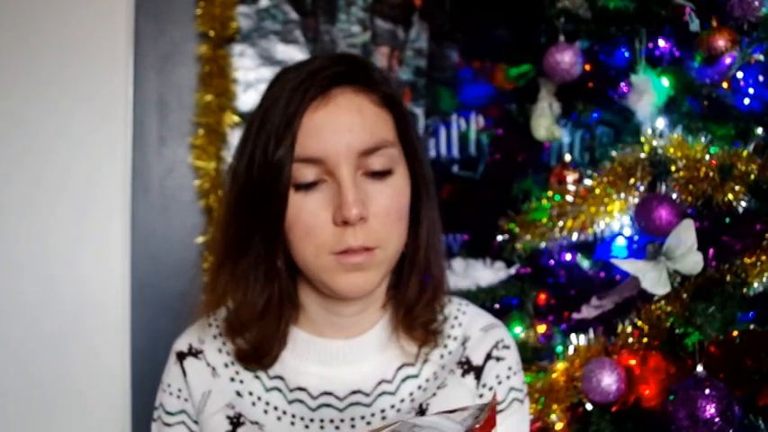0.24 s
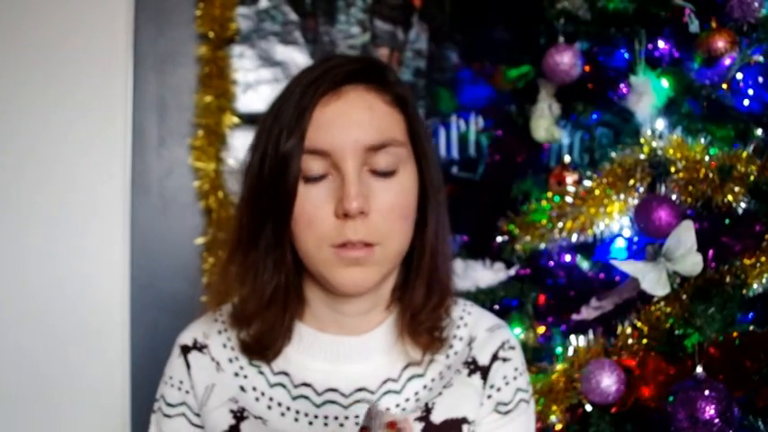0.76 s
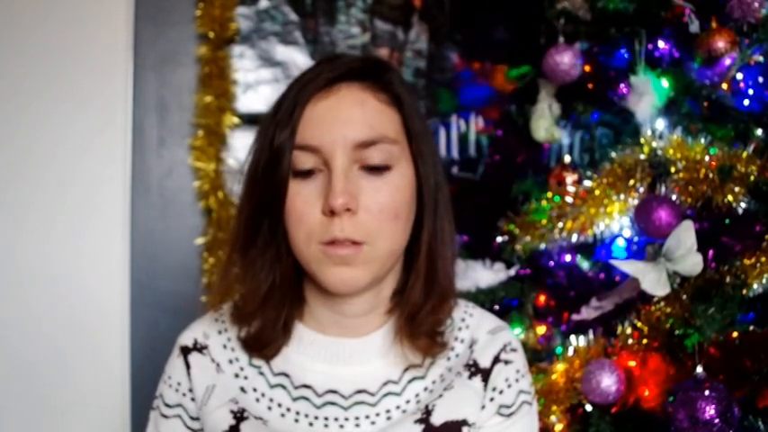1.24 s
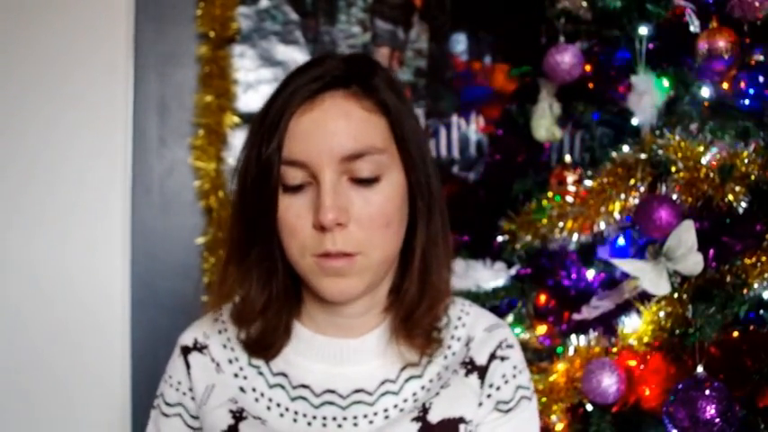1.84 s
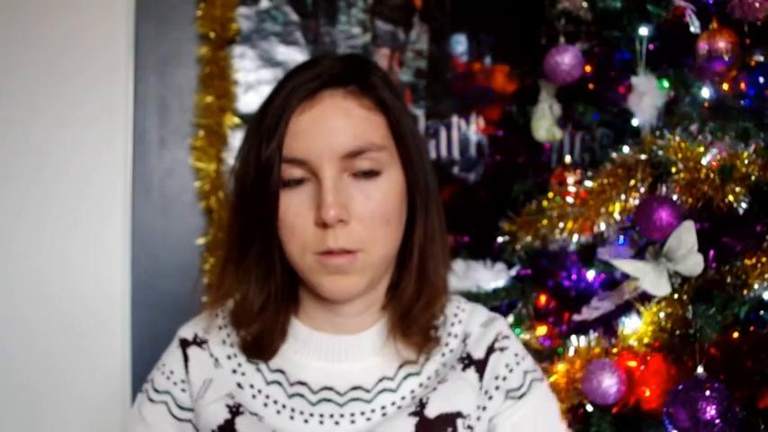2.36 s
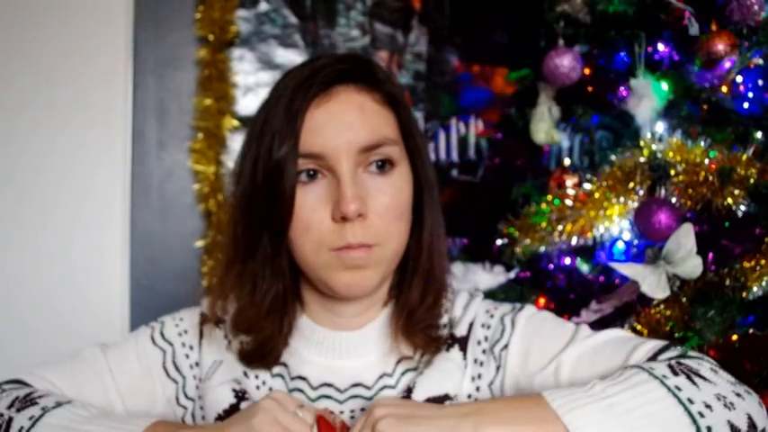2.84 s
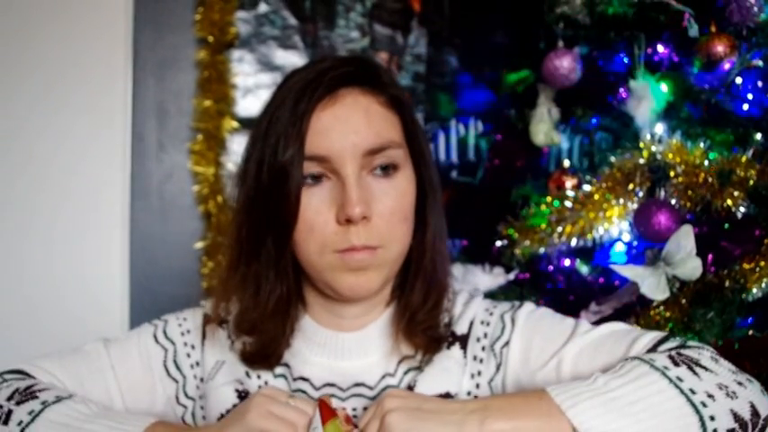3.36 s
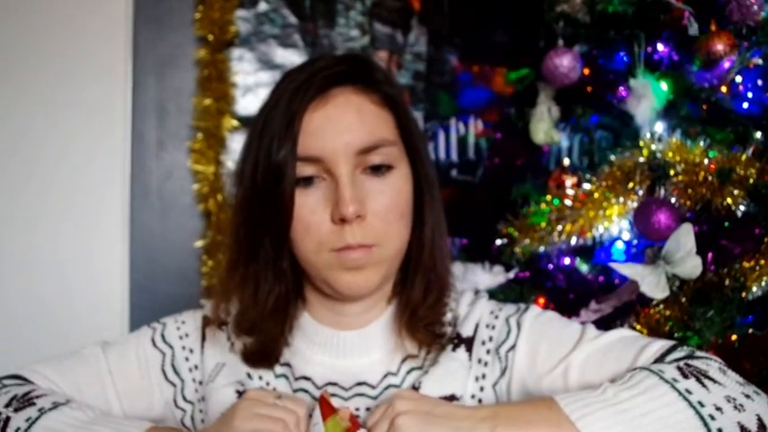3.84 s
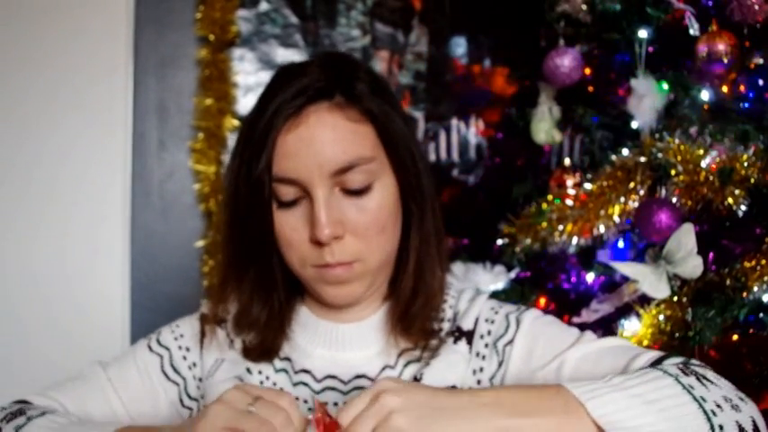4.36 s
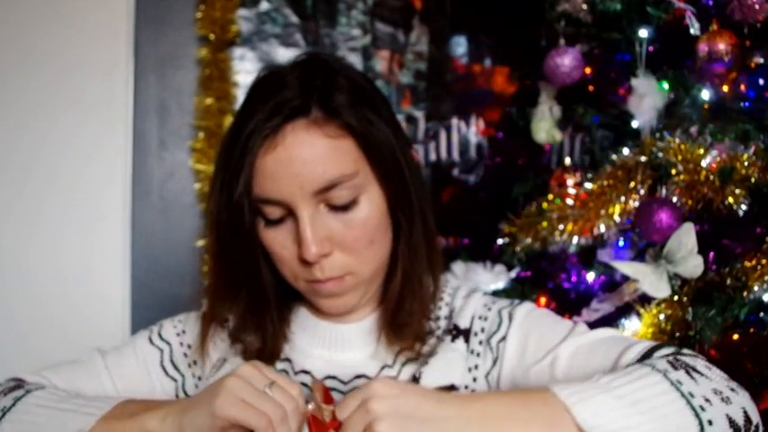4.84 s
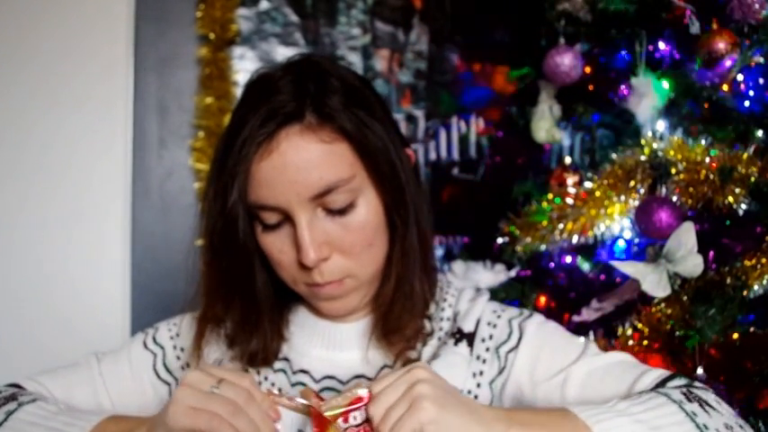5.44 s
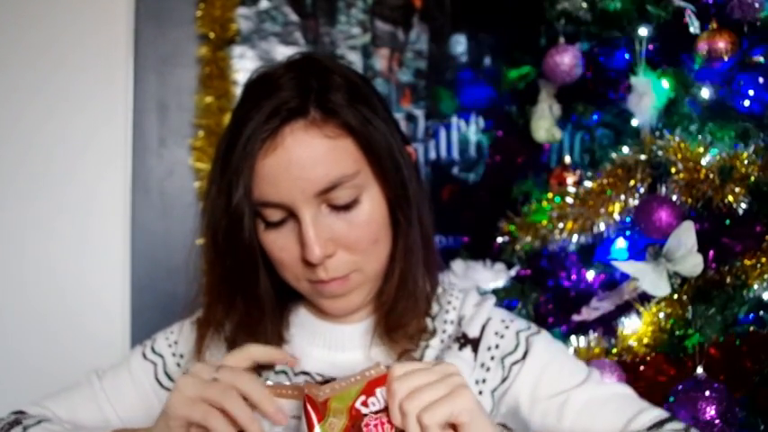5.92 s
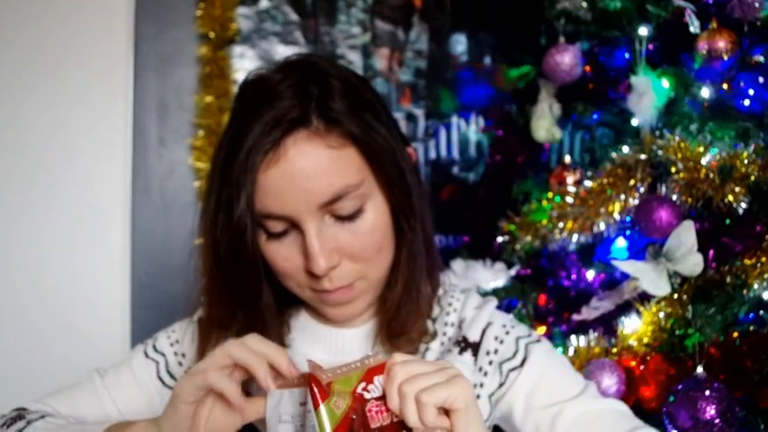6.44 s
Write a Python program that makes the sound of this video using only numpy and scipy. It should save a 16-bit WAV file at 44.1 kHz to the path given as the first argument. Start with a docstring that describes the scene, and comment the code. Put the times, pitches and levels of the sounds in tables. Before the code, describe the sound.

Very close to the microphone in a small room, a plastic snack packet is turned over with bursts of crisp crackle, sharp snaps and dull pouch pops. Around three seconds the seal gives in a quick run of bright ticks, then the taut film squeaks faintly. More tugs crackle and snap before thinning to sparse small rustles over quiet air and a faint hum.

```python
"""Opening a plastic snack packet

A packet is turned over in the hands and pulled open, close to the microphone in a small room.
Creases snap as noise bursts ringing in resonators; folds crackle as random clicks in resonator banks.
The pouch flexes dully, the seam squeaks by stick and slip, and the seal parts in runs of bright ticks.
Quiet air and a faint hum lie behind; the sharpest snaps overload the microphone."""
import sys
import numpy as np
from scipy import signal
from scipy.fft import rfft, irfft, next_fast_len
from scipy.io import wavfile
from scipy.ndimage import uniform_filter1d

SR = 44100
rng = np.random.default_rng(int(sys.argv[2]) if len(sys.argv) > 2 else 0)


def bounce(signal):
    """Save signal as a 16-bit WAV file at the path given by the first command-line argument."""
    frames = np.transpose(np.atleast_2d(signal))
    limited = np.clip(frames, -1, 1)
    pcm = np.round(limited * 32767).astype(np.int16)
    wavfile.write(sys.argv[1], SR, pcm)


N = 295029
TIME = np.arange(N) / SR
OPPOSITE = np.array([[1], [-1]])   # equal and opposite in left and right


def from_db(db):
    """Logarithmic level: decibels to amplitude gain."""
    return 10 ** (np.asarray(db) / 20)


def rms_one(x):
    """Power normalization: scale to unit rms."""
    return x / np.sqrt(np.mean(x ** 2) + 1e-20)


def at_hz(points, hz):
    """Logarithmic frequency scale: read a table between its points."""
    known_hz, values = np.transpose(points)
    return np.interp(np.log(np.maximum(hz, 1)), np.log(known_hz), values)


def drift(rate):
    """Random modulation: noise joined by straight lines, `rate` points per second, rms 1."""
    knots = rng.standard_normal(N // 10)
    return rms_one(np.interp(TIME * rate, np.arange(len(knots)), knots))


def stroke(start, length, edge_s):
    """Kinematics of a movement: progress from 0 to 1, and a gain that fades in and out at its ends."""
    age = TIME - start
    progress = np.clip(age / length, 0, 1)
    fade = np.clip(np.minimum(age, length - age) / edge_s, 0, 1)
    return progress, fade


def colour(x, spectrum, size=4096):
    """Minimum-phase filtering: the folded cepstrum gives a causal response with the given spectrum."""
    gain = from_db(at_hz(spectrum, np.fft.rfftfreq(size, 1 / SR)))
    cepstrum = irfft(np.log(gain))
    cepstrum[1:size // 2] *= 2
    cepstrum[size // 2 + 1:] = 0
    response = irfft(np.exp(rfft(cepstrum)))
    return signal.oaconvolve(x, response[None], axes=-1)[:, :x.shape[-1]]


def resonate(x, hz, width_hz):
    """Damped resonance: a two-pole filter with about unit gain at its peak."""
    r = np.exp(-np.pi * width_hz / SR)
    zeros = np.array([1, 0, -1]) * (1 - r * r) / 2
    poles = [1, -2 * r * np.cos(2 * np.pi * hz / SR), r * r]
    return signal.lfilter(zeros, poles, x + 1e-18)


# likeness of the two microphone ports in diffuse sound: hz, correlation
PORT_LIKENESS = [(100, .98), (350, .98), (700, .88), (1400, .58), (3000, .15), (8000, .05), (16000, 0)]


def diffuse(length):
    """Diffuse-field coherence: white stereo noise from all sides, alike at the two ports in the bass only."""
    size = next_fast_len(length)
    mid, side = rfft(rng.standard_normal((2, size)))
    alike = np.clip(at_hz(PORT_LIKENESS, np.fft.rfftfreq(size, 1 / SR)), -1, 1)
    both = np.sqrt((1 + alike) / 2) * mid + np.sqrt((1 - alike) / 2) * side * OPPOSITE
    return irfft(both, size)[:, :length]


# spectrum of the still air: hz, relative_db
AIR_SPECTRUM = [(15, 6), (35, -4), (60, -14), (130, -6.5), (250, -12.5), (500, -12.5), (1000, -12),
                (2000, -15), (4000, -23), (8000, -19.5), (11000, -27.5), (16000, -31)]


def still_air(level_db=-49.5):
    """Stationary diffuse noise: coloured noise with a steady rms level."""
    return from_db(level_db) * rms_one(colour(diffuse(N), AIR_SPECTRUM))


def hum(hz=120.4, level_db=-65.5):
    """Amplitude modulation: a steady low tone wavers in level."""
    waver = 1 + drift(7.1) / 2
    return from_db(level_db) * waver * np.sin(2 * np.pi * hz * TIME)


# decay time of the room: hz, t60_s
ROOM_DECAY = [(200, 0.42), (1000, 0.2), (4000, 0.34), (8000, 0.25), (16000, 0.22)]
# colour of the wall reflections: hz, relative_db
WALL_COLOUR = [(100, -15.5), (300, -3), (700, 1.5), (1500, 3.5), (4000, -5), (8000, 3), (11000, -1),
               (16000, 11)]


def room_response(wet_db=-6, gap_s=0.0064, near_db=-15, near_s=.0025, size=20000):
    """Reverberant decay: the hands scatter at once; the walls answer later and die away band by band."""
    t = np.arange(size) / SR
    noise = diffuse(size)
    hz, s, bands = signal.stft(noise, SR, nperseg=256)
    decay = from_db(-60 * s / at_hz(ROOM_DECAY, hz)[:, None])
    tail = signal.istft(bands * decay, SR)[1][:, :size]
    walls = colour(rms_one(tail * (t > gap_s)), WALL_COLOUR)
    hands = rms_one(noise * np.exp(-t / near_s))
    return (from_db(wet_db) * walls + from_db(near_db) * hands) / np.sqrt(size)


def room(x, turns_per_s=170, count=4):
    """Time-varying reverberation: facets of the moving packet face different ways, changing the echoes."""
    facing = np.floor(TIME * turns_per_s) % count
    shares = [uniform_filter1d(1.0 * (facing == k), size=128) for k in range(count)]
    out = x
    for share in shares:
        sent = x * np.sqrt(np.abs(share))
        out = out + signal.oaconvolve(sent, room_response(), axes=-1)[:, :N]
    return out


# a panel of the pouch pops in or out under a finger: start_s, relative_peak_db, pitch_hz
PANEL_POPS = [(0.433, -9, 226), (0.654, -5.5, 615), (0.751, -14, 480), (1.574, -16.5, 347),
              (1.74, -22, 256), (1.757, -14, 453), (1.856, -21, 300), (2.114, -25, 540), (2.253, -25, 910),
              (2.529, -24, 402), (3.103, -11, 713), (4.016, -17.5, 510), (4.156, -21, 420),
              (4.847, -23, 390), (5.194, -21, 720)]


def bumps(decay_s=0.0034, width=0.51, level_db=-6, puff_hz=75, puff_db=-20, size=1024):
    """Snap-through buckling: a dull, heavily damped knock and a low puff of displaced air."""
    out = np.zeros(N + size)
    t = np.arange(size) / SR
    puff = from_db(puff_db) * np.sin(2 * np.pi * puff_hz * t) * np.exp(-2 * puff_hz * t)
    for s, peak_db, hz in PANEL_POPS:
        push = rng.standard_normal(size) * np.exp(-t / decay_s)
        knock = resonate(resonate(push, hz, width * hz), hz, 2 * width * hz)
        start = int(s * SR)
        out[start:start + size] += from_db(peak_db + level_db) * (knock / np.abs(knock).max() + puff)
    return out[:N]


def kneading(depth_db=2, per_s=35):
    """Random loading: the hands knead the film unevenly, so its level wanders."""
    return from_db(depth_db * drift(per_s))


# each squeeze or tug of the fingers, levels before kneading and room:
# start_s, length_s, fine_crackle_db, wider_folds_above_fine_db, flexing_pouch_above_fine_db
HAND_GRIPS = [(0, 0.052, -42.5, 3.5, 2), (0.359, 0.11, -31, 0, -4.5), (0.441, 0.045, -23.5, -0.5, -13),
              (0.588, 0.13, -38, 2.5, -1), (0.737, 0.017, -22, 0.5, -7), (0.859, 0.039, -26, -1.5, -13),
              (0.983, 0.13, -27, -4, -10), (1.205, 0.029, -30, -9.5, -18), (1.393, 0.02, -25.5, -6.5, -19),
              (1.494, 0.09, -27, -3.5, -11.5), (1.629, 0.041, -26.5, -2, -14),
              (1.739, 0.13, -34.5, -0.5, 0.5), (1.913, 0.059, -40.5, -0.5, -1),
              (2.077, 0.054, -51.5, 10, 10.5), (2.226, 0.064, -24.5, -14.5, -12),
              (2.347, 0.037, -33, -8, -11.5), (2.505, 0.14, -36, -6, -5.5),
              (2.668, 0.16, -32.5, -12, -18.5), (2.792, 0.058, -32, -1.5, -8.5),
              (2.919, 0.079, -32.5, -7, -12.5), (3.025, 0.092, -36.5, -1.5, -10),
              (3.342, 0.075, -33, -10, -22), (3.43, 0.047, -35, -7, -17), (3.517, 0.043, -28.5, -31, -24),
              (3.67, 0.14, -46, -31.5, -41), (3.822, 0.15, -31.5, -12.5, -28),
              (4.008, 0.14, -33, -2.5, -13.5), (4.195, 0.089, -42, 0, -8.5),
              (4.356, 0.12, -31.5, -7.5, -12), (4.505, 0.11, -37, -4, -6), (4.734, 0.031, -33, -2.5, -4),
              (4.822, 0.092, -31, -4.5, -9.5), (4.974, 0.061, -25, -3, -9.5), (5.185, 0.042, -33, -2, -6),
              (5.29, 0.094, -35, 0.5, -4), (5.494, 0.072, -46.5, 6.5, 4), (5.578, 0.057, -47.5, 6, 1.5),
              (5.645, 0.057, -35.5, -1.5, -6), (5.805, 0.057, -33.5, -4.5, -12.5),
              (5.871, 0.091, -44.5, -1.5, -1), (6.066, 0.015, -46.5, 12, 4), (6.418, 0.016, -41, 2, -10),
              (6.642, 0.054, -41, -9, -4)]


def gripping(levels_db, relax_db_per_s, attack_s=0.0096, resting_db=-63.5):
    """Exponential relaxation: each grip rises fast, holds and dies away over a faint resting rustle."""
    coarse_time = TIME[::16]
    power = from_db(resting_db) ** 2
    for (start, length, *_), db in zip(HAND_GRIPS, levels_db):
        age = coarse_time - start
        rise = np.clip(age / attack_s, 0, 1) ** 2
        fall = from_db(db - relax_db_per_s * np.maximum(age - length, 0))
        power = power + (rise * fall) ** 2
    return np.interp(TIME, coarse_time, np.sqrt(power))


# colour of the film: hz, relative_db
FILM_COLOUR = [(100, -16.5), (250, 6), (600, 4.5), (1200, 7), (2500, 9.5), (4500, 9.5), (6500, 9.5),
               (8100, 11), (9300, 6.5), (10500, 2), (13000, -3.5), (16000, -18)]


def crackle(low_hz, high_hz, per_s, spread_db, width, apart, count=10):
    """Clustered random impulses: tiny buckles each ring one facet, at a random place; running rms near 1."""
    clumps = from_db(4 * drift(70))
    at = np.flatnonzero(rng.random(N) < per_s * clumps / SR)
    sizes = from_db(spread_db * np.minimum(rng.exponential(1, N), 3.8))[at] * rng.choice([-1, 1], N)[at]
    facet = rng.integers(0, count, N)[at]
    place = rng.standard_normal(N)[at]
    out = np.zeros((2, N))
    for k, hz in enumerate(np.geomspace(low_hz, min(high_hz, .45 * SR), count)):
        clicks = np.zeros((2, N))
        clicks[:, at] = sizes * (facet == k) * (1 + apart * place * OPPOSITE)
        out += resonate(clicks, hz, width * hz)
    # a facet radiates little below its own ring
    thin = signal.butter(2, low_hz / 2, "high", fs=SR, output="sos")
    out = signal.sosfilt(thin, colour(out, FILM_COLOUR))
    running_power = uniform_filter1d(np.mean(out ** 2, axis=0), size=2048)
    return out / np.sqrt(running_power + 1e-12)


# the seam is held taut: start_s, length_s
TAUT_TIME = (3.345, .5)


def taut_film(low_hz=5200, high_hz=11600, first_db=-35, last_db=-45, flicker_db=4, count=10):
    """Distributed friction: small contacts squeal faintly, each coming and going at a wandering pitch."""
    wander, rough = .04, .026   # slow and fast pitch deviation, natural-log units rms
    progress, fade = stroke(*TAUT_TIME, edge_s=.01)
    out = np.zeros(N)
    for hz in np.geomspace(low_hz, high_hz, count):
        slips = hz * np.exp(wander * drift(45) + rough * drift(2500))
        out += from_db(flicker_db * drift(35)) * np.sin(2 * np.pi * np.cumsum(slips) / SR)
    return rms_one(out) * fade * from_db(first_db + (last_db - first_db) * progress)


# short squeaks of the stretched seam, pitch before its waver:
# start_s, length_s, first_slips_hz, last_slips_hz, relative_level_db, gain_per_overtone_db
SEAM_SQUEAKS = [(3.356, .03, 6500, 3700, -41, 12), (3.44, 0.045, 3250, 3050, -38, 0),
                (3.492, 0.018, 2800, 4200, -50, 4), (3.542, .03, 5800, 3600, -32.5, -5),
                (3.57, .036, 4800, 3400, -29, -1), (3.643, 0.099, 3000, 4000, -56, 0),
                (3.736, 0.068, 3000, 3400, -59, 11.5), (3.799, 0.046, 3200, 5100, -39.5, 4)]
# partials of the squeak, half orders coming from uneven slips: multiple, relative_db
SEAM_PARTIALS = [(.5, -16), (1, 0), (1.5, -8), (2, 2), (2.5, -12), (3, -3)]


def squeak(edge_s=0.005):
    """Stick-slip friction: each squeak glides and wavers in pitch; each partial flutters on its own."""
    hz, gain, bright_db = np.zeros((3, N))
    for start, length, from_hz, to_hz, db, step_db in SEAM_SQUEAKS:
        progress, fade = stroke(start, length, edge_s)
        on = fade > 0
        hz[on] = from_hz + (to_hz - from_hz) * progress[on]
        gain[on] = from_db(db) * fade[on]
        bright_db[on] = step_db
    slips = hz * (1 + .012 * drift(150) + .028 * drift(2500))
    phase = 2 * np.pi * np.cumsum(slips) / SR
    out = np.zeros(N)
    for multiple, part_db in SEAM_PARTIALS:
        strength = from_db(part_db + bright_db * (multiple - 1) + 3 * drift(500))
        out += strength * np.sin(multiple * phase)
    return signal.sosfilt(signal.butter(7, 11300, fs=SR, output="sos"), out * gain)


# the seal gives way in pulls, tick rates before their unevenness:
# start_s, length_s, first_ticks_per_s, last_ticks_per_s, relative_level_db
SEAL_PULLS = [(2.955, .15, 150, 1200, -10.5), (3.815, 0.12, 160, 260, -8)]


def peel(hz=8400, width_hz=6500, surge_db=3, scatter_db=4.5, runaway=2.2, uneven=.28):
    """Progressive fracture: the crimped seal parts in bright ticks that speed up and grow as it gives."""
    ticks = np.zeros(N)
    for start, length, first_per_s, last_per_s, db in SEAL_PULLS:
        progress, fade = stroke(start, length, edge_s=.01)
        per_s = first_per_s + (last_per_s - first_per_s) * progress ** runaway
        teeth = np.floor(np.cumsum(per_s * np.exp(uneven * drift(600))) / SR)
        ticks += np.diff(teeth, prepend=0) * from_db(db + surge_db * progress) * fade
    ticks = ticks * from_db(scatter_db * rng.standard_normal((2, N)))
    return colour(resonate(resonate(ticks, hz, width_hz), hz, 2 * width_hz), FILM_COLOUR)


def lesser_snaps(effort, above_db=19, scatter_db=2.0, centre_hz=6600, octaves=0.36, lows_db=-24, count=220):
    """Load-driven buckling: smaller creases give way at random, as hard as the fingers press."""
    slots = np.arange(count) + rng.uniform(.1, .9, count)   # one snap in each equal slot of time
    times = slots / count * TIME[-1]
    size, pitch, lows = np.clip(rng.standard_normal((count, 3)), -1.4, 1.4).T
    strength_db = 20 * np.log10(np.interp(times, TIME, effort)) + above_db + scatter_db * size
    ring_hz = np.minimum(centre_hz * 2 ** (octaves * pitch), SR / 4)
    return list(zip(times, strength_db, ring_hz, lows_db + 6 * lows))


# the loudest creases snapping through: start_s, relative_strength_db, ring_centre_hz, relative_lows_db
LOUD_SNAPS = [(0.3693, 0, 1960, -20), (0.3893, -16, 7700, -10), (0.4691, -6, 7900, -6.5),
              (0.4763, -2, 1400, -11), (0.6059, -9, 1780, -8.5), (0.6556, 7.5, 2500, -12),
              (0.7526, 2.5, 5700, -15), (0.7617, 0, 2900, -26), (0.8578, -4, 8500, -10),
              (0.8884, -11, 6550, -10), (0.8942, 3.0, 7740, -15), (0.9792, 7, 9200, -29),
              (0.9925, -15, 8400, -36), (1.0131, -2, 4300, -24), (1.0602, 0.0, 4330, -14.5),
              (1.085, -4, 6500, -29), (1.108, -3, 3100, -36), (1.2206, -22, 6200, -34),
              (1.3886, 4.5, 9300, -27.5), (1.3964, -8.5, 8000, -37), (1.4939, -6.5, 8900, -21),
              (1.559, 0.5, 8200, -43), (1.6431, -5.5, 2260, -15), (1.8327, -7.0, 5500, -10),
              (1.8907, -0.5, 5170, -41), (2.2298, -7.5, 7100, -37), (2.2374, -9, 8450, -15),
              (2.2614, -2, 6300, -26), (2.2998, -3.5, 7100, -29), (2.367, -3.5, 6900, -23),
              (2.5404, 0, 6600, -25), (2.5769, -4.5, 5640, -28), (2.6596, -3, 11100, -26),
              (2.7346, -5.5, 6400, -29), (2.8111, -3, 7900, -38), (2.8161, 2, 7600, -30),
              (2.9528, -1.5, 7600, -14), (3.057, -7.5, 3700, -37), (3.1036, 9.5, 8300, -33),
              (3.1138, 0, 7900, -27), (3.1297, 2.5, 8400, -46), (3.1471, -12.5, 6600, -10.5),
              (3.3425, -4, 11200, -24), (3.3505, -11, 8500, -40), (3.3776, 1, 8400, -20.5),
              (3.522, -4.5, 8400, -25), (3.6103, 2, 8650, -36), (4.0205, -1.5, 8500, -30),
              (4.063, -3, 3300, -22), (4.0791, 1.5, 4560, -55), (4.2059, -14, 6260, -25),
              (4.3591, -6.5, 5960, -44), (4.5785, 5.5, 3700, -39), (4.738, -9, 6500, -18),
              (4.7495, -7.5, 8000, -41), (4.8325, 1, 6600, -48), (4.887, -6.5, 6400, -33),
              (4.8945, -11, 6900, -27), (5.0071, 1.0, 6800, -33), (5.038, 5, 5630, -21),
              (5.0809, 4, 6960, -29), (5.3297, -1.5, 4440, -30), (5.5741, 2.5, 9400, -27),
              (5.8191, -2, 7950, -52), (5.8266, -4, 8100, -47), (5.9904, 2, 7100, -55),
              (6.0824, -2, 920, -14.5), (6.4276, -13.5, 4170, -7)]


def snaps(rows, crack_s=0.00023, flutter_db=-7, ring_width=0.26, broad_db=-5, thin_hz=900,
          thud_hz=700, thud_width_hz=800, thud_db=6, size=640):
    """Impulsive buckling: a crease creaks, then cracks and flutters, with a soft thud of the pouch behind."""
    flutter_s, creak_s, creak_db, pan_db = .0012, .0004, -17, 1.2
    before = size // 5   # samples left for the creak before the flip
    out = np.zeros((2, N + size))
    t = (np.arange(size) - before) / SR
    thin = signal.butter(2, thin_hz, "high", fs=SR, output="sos")   # the crease alone radiates no lows
    flutters = diffuse(len(rows) * size).reshape(2, -1, size)
    pans = rng.standard_normal(len(rows))
    for k, (s, strength_db, hz, lows_db) in enumerate(rows):
        crack = (t >= 0) * np.exp(-abs(t) / crack_s) * (rng.standard_normal(size) + 3 * (t == 0))
        flutter = from_db(flutter_db) * rms_one(flutters[:, k] * (t >= 0) * np.exp(-abs(t) / flutter_s))
        creak = from_db(creak_db) * rms_one(flutters[:, k] * (t < 0) * np.exp(-abs(t) / creak_s))
        push = rms_one(crack) + flutter + creak
        bright = resonate(push, hz, ring_width * hz) + from_db(broad_db) * push
        ring = rms_one(signal.sosfilt(thin, bright))
        thud = rms_one(resonate(resonate(push, thud_hz, thud_width_hz), thud_hz, 2 * thud_width_hz))
        wave = (ring + from_db(thud_db + lows_db) * thud) / np.sqrt(size)
        start = int(s * SR) - before
        out[:, start:start + size] += wave * from_db(strength_db + pan_db * pans[k] * OPPOSITE)
    return colour(out[:, :N], FILM_COLOUR)


def scene():
    """Superposition: the packet, its film slightly to the right, over quiet air and a faint hum."""
    _, _, fine_db, folds_db, pouch_db = np.transpose(HAND_GRIPS)
    knead = kneading()
    effort = gripping(fine_db, relax_db_per_s=252)
    folds_grip = gripping(fine_db + folds_db, relax_db_per_s=247)
    pouch_grip = gripping(fine_db + pouch_db, relax_db_per_s=198)
    fine = knead * effort * crackle(5650, 9400, per_s=1200, spread_db=-0.5, width=0.77, apart=1.0)
    folds = knead * folds_grip * crackle(1180, 3930, per_s=600, spread_db=3.0, width=0.57, apart=0.77)
    pouch = knead * pouch_grip * crackle(212.0, 943, per_s=600, spread_db=2.0, width=0.19, apart=0.15)
    creases = snaps(LOUD_SNAPS + lesser_snaps(effort))
    film = creases + fine + folds + peel() + squeak() + taut_film()
    to_the_right = from_db([[-.85], [.85]])
    packet = room(film * to_the_right + pouch + bumps())
    return packet + still_air() + hum()


def record(dry, top=0.94, swell_db=11, settle_hz=7, cutoff_hz=16200):
    """Nonlinear saturation: loud snaps overload the input, leaving a slow sub-bass swell; the top is cut."""
    clipped = top * np.tanh(dry / top)
    overload = np.abs(dry - clipped)
    swell = signal.sosfilt(signal.butter(1, settle_hz, fs=SR, output="sos"), overload)
    swell = signal.sosfilt(signal.butter(1, settle_hz / 2, "high", fs=SR, output="sos"), swell)
    top_cut = signal.ellip(10, .1, 80, cutoff_hz, fs=SR, output="sos")
    return signal.sosfilt(top_cut, clipped + from_db(swell_db) * swell)


dry = scene()
out = record(dry)
bounce(out)
```